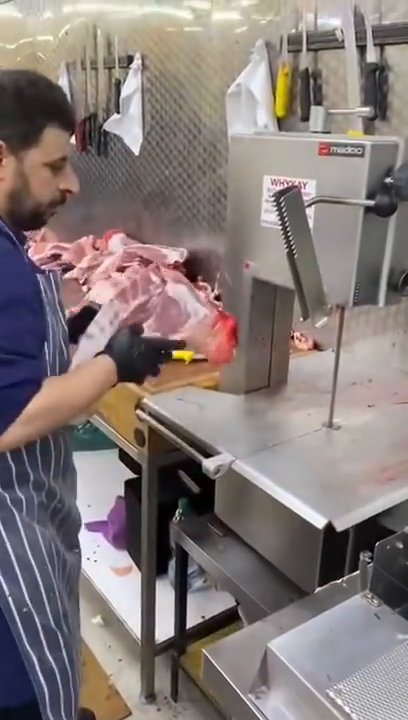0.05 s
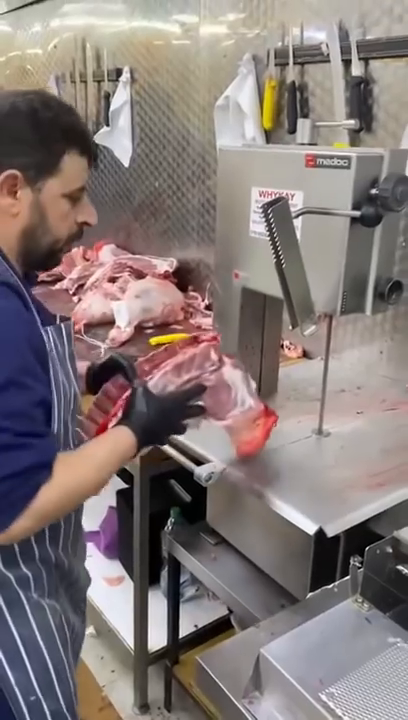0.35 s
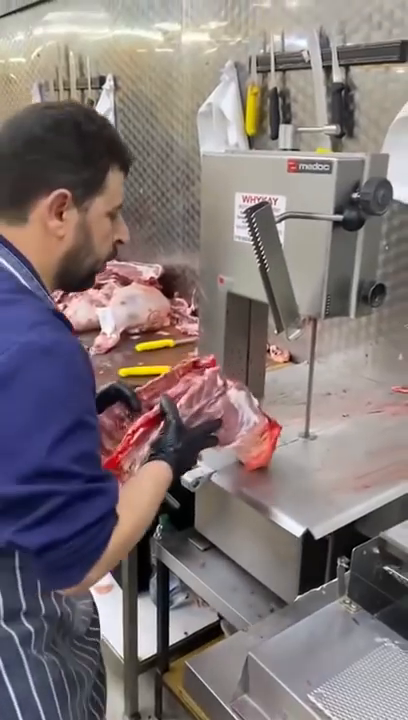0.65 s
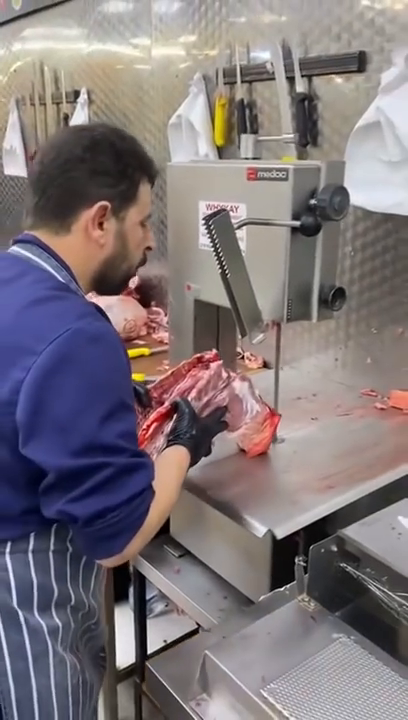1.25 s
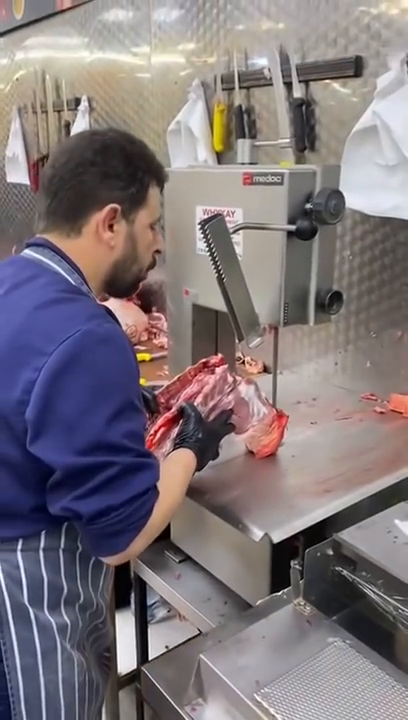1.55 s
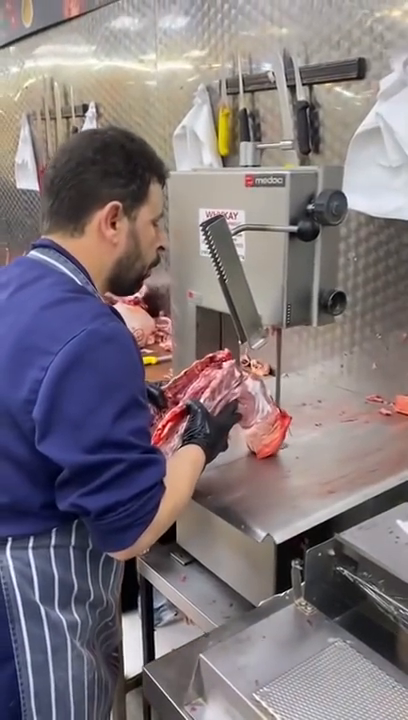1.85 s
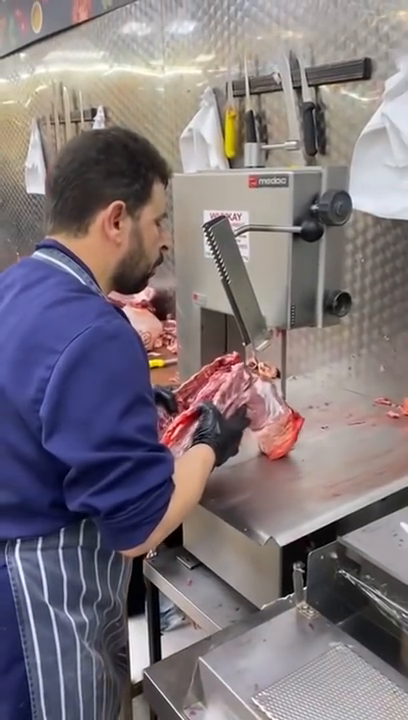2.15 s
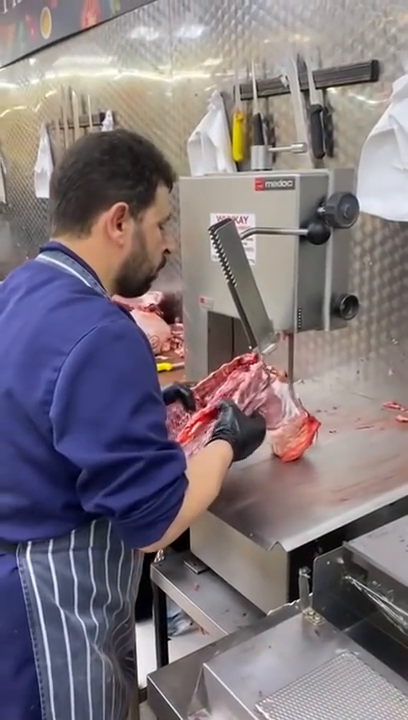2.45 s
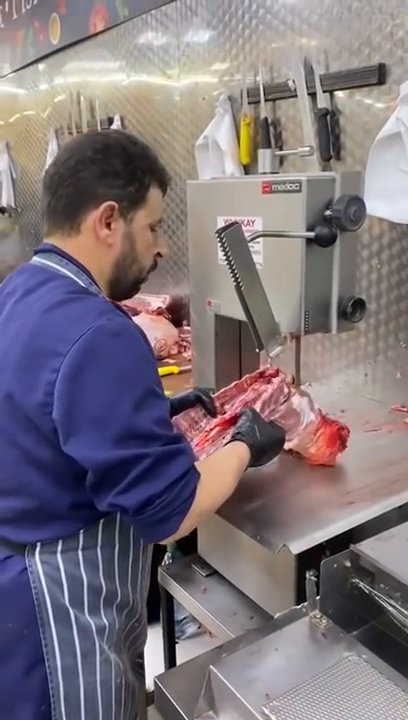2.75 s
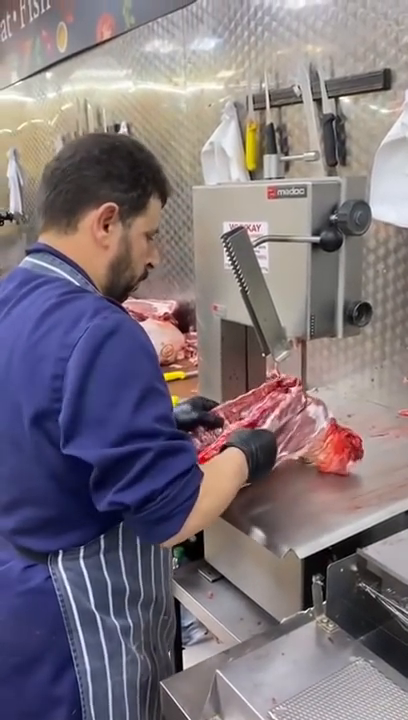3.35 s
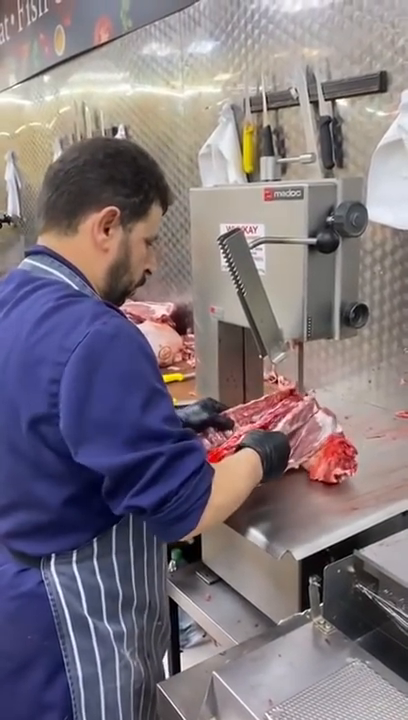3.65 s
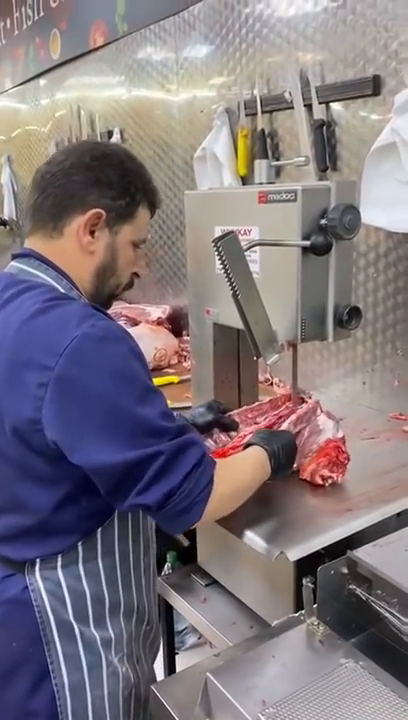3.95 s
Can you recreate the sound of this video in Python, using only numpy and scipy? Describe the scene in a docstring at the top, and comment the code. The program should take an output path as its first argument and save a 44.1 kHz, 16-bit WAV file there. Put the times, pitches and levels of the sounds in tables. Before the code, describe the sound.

A bandsaw hums, then squeals and rasps loudly as it cuts through meat and bone.

```python
"""A butcher's bandsaw

In a small steel-lined room the motor rumbles and hums, and the blade hisses in its guides.
A joint of meat thuds onto the table and is pushed into the blade. In the bone the blade squeals
near 1.5 kHz, sagging in pitch and turning rough under load, while the teeth rasp."""
import sys
import numpy as np
from scipy import signal
from scipy.fft import rfft, irfft
from scipy.io import wavfile

SR = 44100
rng = np.random.default_rng(int(sys.argv[2]) if len(sys.argv) > 2 else 0)


def transcribe(signal):
    """Save signal, clipped to [-1, 1], as a 16-bit WAV file at the path in sys.argv[1]."""
    frames = np.atleast_2d(signal).T
    limited = np.clip(frames, -1, 1)
    pcm = np.round(limited * 32767).astype(np.int16)
    wavfile.write(sys.argv[1], SR, pcm)


N = 176400
T = np.arange(N) / SR
FREQS = np.maximum(np.arange(N // 2 + 1) * SR / N, 1)
BITE_S = 1.5   # the blade meets bone


def squeal(cut_db):
    """The blade sticks and slips in the bone. The more it is slowed, the brighter and rougher it gets."""
    # pitch of the squeal: time_s, pitch_hz
    pitch = [(1.52,1532),(1.95,1525),(2.1,1477),(2.2,1485),(2.3,1446),(2.42,1450),(2.54,1400),(2.63,1326),(2.72,1419),(2.86,1451),(2.95,1502),(3.19,1495),(3.3,1439),(3.45,1430),(3.7,1447),(3.85,1431),(3.97,1398)]
    # surges of the lowest partial (partials are tones at 1, 2, 3... times the pitch): time_s, level_db
    first_level = [(1.52,-55),(1.57,-30.5),(1.78,-29.5),(1.87,-57.5),(1.96,-29.5),(2.09,-44),(2.14,-38.5),(2.18,-34),(2.25,-49),(2.33,-33.5),(2.43,-55),(2.47,-40.5),(2.84,-47.5),(2.92,-54.5),(3.07,-48),(3.19,-47.5),(3.3,-55.5),(3.58,-50.5),(3.65,-43.5),(3.74,-54),(3.85,-37),(3.93,-47.5)]
    # second partial, compared with the cut's force: time_s, level_db
    second_share = [(1.64,3),(1.72,-3),(2.2,-12.5),(2.6,-7.5),(3.1,-12),(3.7,-3),(4,-11.5)]
    # the teeth catch and an overtone shrieks: time_s, pitch_hz, boost_db
    snags = [(2.103,10100,18),(2.205,9100,11),(2.225,10700,20),(2.385,7500,7.5),(2.403,7500,4.5),(2.409,10900,14),(3.346,7750,12.5),(3.417,5640,15.5),(3.712,7160,13.5),(3.944,7500,12),(3.968,4300,9.5),(3.973,5500,7),(3.992,6900,10)]
    hz, = in_time(pitch)
    free_hz = 1540
    sag = (free_hz - hz) / free_hz   # fraction of the pitch lost under load
    wobble = 0.0329 * drift(rate=18)   # the meat is fed in unevenly
    jitter = 0.0836 * drift(rate=106)
    phase = turning(hz + hz * sag * (wobble + jitter))

    wheel_hz = 25
    throb_db = 2.5 * np.cos(2 * np.pi * wheel_hz * T)   # follows the turning of the drive
    first_db = in_time(first_level)[0] + throb_db
    second_db = cut_db + in_time(second_share)[0]
    third_db = (second_db + cut_db) / 2 - 1 - 46 * sag   # fades under load
    dull_db = 76 * np.minimum(sag - .04, 0)   # a lightly loaded blade has weak upper partials
    stutter_db = 19 * sag * np.tanh(drift(rate=163))   # uneven grip shakes them all together
    upper_db = [cut_db + db + dull_db + stutter_db for db in (-5, -2, -3, -2, 1)]
    levels = [first_db, second_db, third_db] + upper_db

    out = 0
    for k, db in enumerate(levels, 1):
        height = k / len(levels)
        roughness = from_db(-1.5 + 39 * sag) * height ** 0.64
        # a narrow band of noise around the partial
        fuzz = drift(rate=112) * np.sin(k * phase) + drift(rate=112) * np.cos(k * phase)
        partial = np.sqrt(2) * np.sin(k * phase + 2 * np.pi * rng.random())
        partial *= flicker(depth_db=7.5 * np.sqrt(height), rate=38)
        snag_db = sum(boost_db * bell(T, time_s, width=0.0096) * bell(k * hz, snag_hz, width=1240)
                      for time_s, snag_hz, boost_db in snags)
        out += from_db(db + snag_db) * (partial + roughness * fuzz) / np.hypot(1, roughness)
    return out


def rasp(cut_db):
    """Teeth scrape in uneven surges; in hard bone they crunch off a spray of chips."""
    # tone colour of the teeth: frequency_hz, level_db
    spectrum = [(300,-8),(600,-1),(1200,-1),(2000,1),(2550,9),(3500,-1),(4500,7),(5600,7),(11000,6),(12500,2)]
    # scraping, compared with the cut's force: time_s, level_db
    scrape_share = [(1.6,-1.5),(1.98,0),(2.1,-3),(2.54,-4.5),(2.62,6),(2.73,-7),(3.2,-4.5),(4,-4.5)]
    # hard spots in the bone: time_s, level_db
    crunches = [(1.69,-25.5),(2.3,-26),(2.385,-28),(2.592,-27),(2.63,-32),(3.431,-28)]
    colour = from_db(at_hz(spectrum))
    share_db, = in_time(scrape_share)
    scrape = from_db(cut_db + share_db) * flicker(depth_db=2, rate=77) * noise(colour)
    chips_per_s = 1800
    clicks = (rng.random(N) < chips_per_s / SR) * rng.standard_normal(N)
    chips = rms_one(irfft(rfft(clicks) * colour, N))
    bursts = sum(from_db(db) * bell(T, time_s, width=0.024) for time_s, db in crunches)
    return scrape + bursts * chips


def drone(cut_db):
    """The loaded saw drones, louder the harder it cuts."""
    # tones of the drone, compared with the cut's force: pitch_hz, level_db
    tones = [(597,-27.5),(838,-28.5),(1155,-29)]
    return sum(from_db(cut_db + db) * tone(hz) for hz, db in tones)


def landings():
    """Soft meat thuds on the steel table with a dull slap."""
    # the meat hits the table: start_s, thud_db, thud_hz, thud_fade_s (to fall 60 dB), slap_db, slap_top_hz
    hits = [(0.074,-26.5,119,0.23,-39,400),(.083,-22,725,0.037,-29,1160),(0.111,-24.5,70.4,0.33,-40,900),(0.525,-22.5,215,0.13,-33,420)]
    attack_s, slap_fade_s = 0.0017, 0.29
    out = 0
    for start_s, thud_db, thud_hz, thud_fade_s, slap_db, slap_top_hz in hits:
        age = np.maximum(T - start_s, 0)
        thud = from_db(thud_db - 60 * age / thud_fade_s) * np.sin(2 * np.pi * thud_hz * age)
        dull_noise = noise(1 / np.sqrt(1 + (FREQS / slap_top_hz) ** 3))
        slap = from_db(slap_db - 60 * age / slap_fade_s) * dull_noise
        attack = 1 - np.exp(-age / attack_s)
        out += attack * (thud + slap)
    return out


def flesh():
    """Before and around the first bone the blade swishes through soft meat."""
    start_s, end_s, fade_s = 1.1, 1.98, 0.03
    centre_hz, level_db = 1230, -47.5
    inside = np.clip(np.minimum(T - start_s, end_s - T) / fade_s, 0, 1)
    return from_db(level_db) * inside * noise(np.exp(-np.log2(FREQS / centre_hz) ** 2))


def chirps():
    """The free-running blade gives short, thin squeaks, each on one of its overtones."""
    # squeaks of the blade: middle_s, half_length_s, pitch_hz, level_db
    squeaks = [(0.037,0.11,3693,-40),(0.51,0.14,7335,-45),(0.544,.08,5502,-45.5),(0.563,0.029,9135,-38),(0.49,0.15,11000,-44)]
    return sum(from_db(db) * bell(T, middle_s, half_s) * tone(hz) for middle_s, half_s, hz, db in squeaks)


def guides():
    """The running blade hisses and rings in its guides."""
    # tone colour of the hiss: frequency_hz, level_db
    spectrum = [(1500,-3),(2600,-3),(4200,1.5),(5800,3.5),(8000,-0.5),(9700,-2.5),(11500,-60)]
    # loudness of hiss and ringing together: time_s, level_db
    loudness = [(0,-44),(.55,-43.5),(1.05,-46.5),(4,-50)]
    # ringing, compared with the hiss: pitch_hz, half_width_hz, level_db
    resonances = [(2562,50,-1),(2690,19,-4),(2870,240,-5.5),(3660,62,-5.5)]
    rings = sum(from_db(db) * noise(1 / (1 + ((FREQS - hz) / width) ** 2)) for hz, width, db in resonances)
    hiss = noise(from_db(at_hz(spectrum)))
    return from_db(in_time(loudness)[0]) * (hiss + rings) * flicker(depth_db=1.04, rate=92)


def motor():
    """The wheels rumble, the mains hum, and the drive's whine swells, then fades once the blade bites."""
    # tone colour of the motor and wheels: frequency_hz, level_db
    spectrum = [(25,-36),(36,-6),(48,-4.5),(110,4),(220,-3),(550,-9.5),(1100,-15.5),(2000,-15.5),(3500,-29.5)]
    # loudness of rumble and hum together: time_s, level_db
    loudness = [(0,-37.5),(1.9,-36.5),(2.15,-42.5),(2.6,-46.5),(3.2,-43.5),(4,-46.5)]
    # steady motor tones, compared with the rumble: pitch_hz, level_db
    hum_tones = [(100,-15),(199,-10.5),(244,-11)]
    hum = sum(from_db(db) * tone(hz) for hz, db in hum_tones)
    peak_db, swell_db_per_s, fade_s = -48.5, 4.5, 0.21
    swell = from_db(peak_db + swell_db_per_s * np.minimum(T - BITE_S, 0))
    fade = np.clip(1 - (T - BITE_S) / fade_s, 0, 1)
    whine = swell * fade * tone(hz=797.4)
    rumble = noise(from_db(at_hz(spectrum)))
    return from_db(in_time(loudness)[0]) * (rumble + hum) + whine


def room(sound):
    """The steel walls throw back a short, dense echo."""
    fade_s, stereo_width, level_db = 0.09, 0.8, -13
    age = T[:SR // 2]
    mid, side = rng.standard_normal((2, len(age))) * from_db(-60 * age / fade_s)
    tail = mid + stereo_width * side * [[1], [-1]]
    tail /= np.sqrt(np.sum(tail ** 2) / 2)
    return from_db(level_db) * signal.fftconvolve(sound[None], tail, axes=1)[:, :N]


def tone(hz):
    """A machine tone that wavers slightly in pitch and loudness."""
    phase = turning(hz * (1 + .003 * drift(rate=6)))
    return np.sqrt(2) * np.sin(phase) * flicker(depth_db=1.5, rate=10)


def noise(gain):
    """Stereo noise of average power 1, shaped by a gain for each frequency."""
    # how alike left and right are: frequency_hz, likeness (1 = the same)
    likeness = [(100,1),(600,0.89),(1500,0.94),(3000,0.93),(6000,1)]
    alike = np.clip(at_hz(likeness), -1, 1)
    mid, side = rfft(rng.standard_normal((2, N)))
    left_right = np.sqrt(1 + alike) * mid + np.sqrt(1 - alike) * side * [[1], [-1]]
    return rms_one(irfft(gain * left_right, N))


def drift(rate):
    """A smooth random wander of typical size 1; a higher rate moves faster."""
    r = np.exp(-20 * np.pi * rate / SR)
    slow = signal.lfilter([1], [1, -2 * r, r * r], rng.standard_normal(N // 10 + 4002))[4000:]
    return np.interp(np.arange(N) / 10, np.arange(len(slow)), rms_one(slow))


def flicker(depth_db, rate):
    """A randomly wavering gain of average power 1."""
    return rms_one(from_db(depth_db * np.clip(drift(rate), -2, 2)))


def turning(hz):
    """The running phase (angle in the cycle) of a pitch, from a random start."""
    return 2 * np.pi * (np.cumsum(hz + np.zeros(N)) / SR + rng.random())


def bell(x, centre, width):
    """A smooth bump of height 1."""
    return np.exp(-np.square((x - centre) / width))


def in_time(rows):
    """Join a table's points over time with straight lines, one curve per value column."""
    times, *columns = np.transpose(rows)
    return [np.interp(T, times, column) for column in columns]


def at_hz(points):
    """Join a table's points over frequency, with octaves evenly spaced."""
    hz, value = np.transpose(points)
    return np.interp(np.log(FREQS), np.log(hz), value)


def from_db(db):
    """Turn decibels into a gain."""
    return 10 ** (np.asarray(db) / 20)


def rms_one(x):
    """Scale a signal to an average power of 1."""
    return x / np.sqrt(np.mean(x ** 2) + 1e-20)


def scene():
    """The saw idles, the meat is put down, then the cut begins."""
    # force of the cut, as the loudness of the treble: time_s, level_db
    cut_force = [(1.515, -52), (1.565, -29), (1.76, -25), (1.78, -27), (1.88, -50), (1.94, -27), (2.0, -25),
                 (2.3, -31), (2.4, -25.5), (2.43, -29.5), (2.59, -28), (2.62, -34.5), (2.84, -29.5),
                 (2.95, -41.5), (2.98, -35), (3.19, -39.5), (3.24, -31), (3.78, -32.5), (4.0, -25)]
    cut_db, = in_time(cut_force)
    biting = np.clip((T - BITE_S) / .02, 0, 1) * flicker(depth_db=1.2, rate=30)
    blade = biting * squeal(cut_db) + chirps()
    machine = motor() + guides()
    meat = landings() + flesh()
    cutting = biting * (rasp(cut_db) + drone(cut_db))
    return machine + meat + cutting + blade + room(blade)


def record(dry):
    """The treble reaches two microphone openings out of step, and the very top is cut off."""
    # how far the left side is ahead of the right: frequency_hz, lead_radians
    left_lead = [(2050,0),(2580,.8),(3300,.4),(4400,1.7),(4900,3.1),(5400,5.6),(5800,6.9),(6400,6.5),(7200,7.6),(10200,8.5),(11900,9.4)]
    shifted = irfft(rfft(dry) * np.exp(.5j * at_hz(left_lead) * [[1], [-1]]), N)
    cutoff_hz = 12650
    return signal.sosfilt(signal.cheby2(16, 70, cutoff_hz, fs=SR, output="sos"), shifted)


dry = scene()
out = record(dry)
transcribe(out)
```